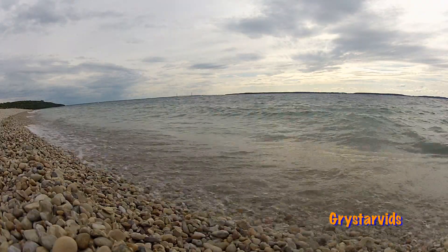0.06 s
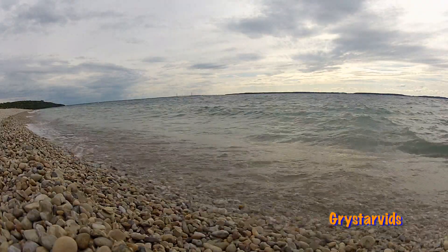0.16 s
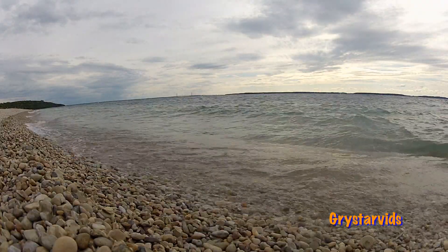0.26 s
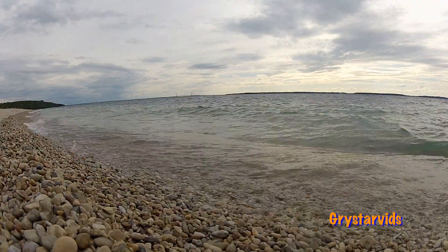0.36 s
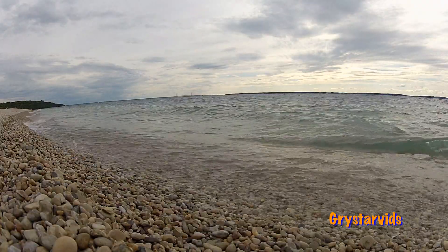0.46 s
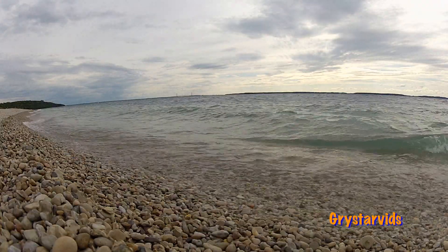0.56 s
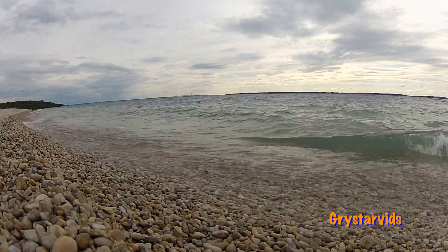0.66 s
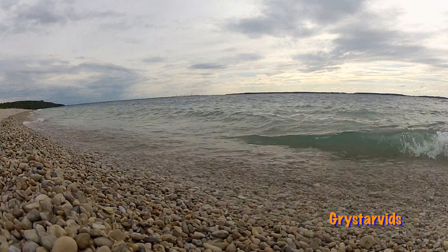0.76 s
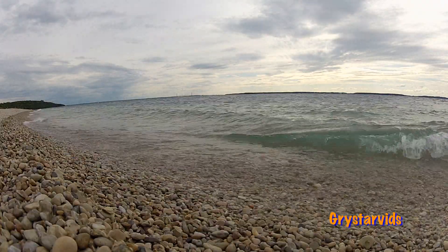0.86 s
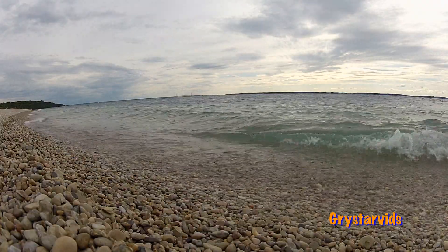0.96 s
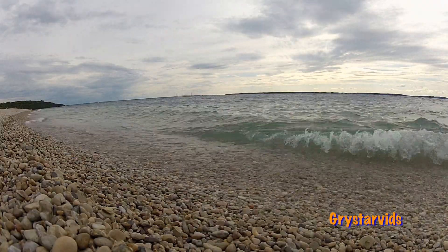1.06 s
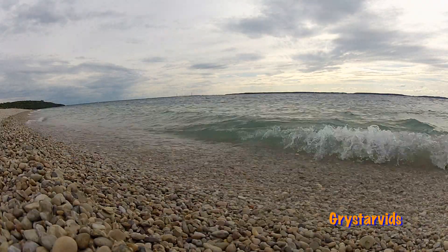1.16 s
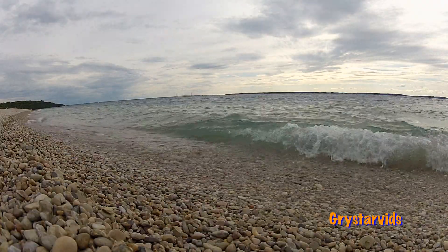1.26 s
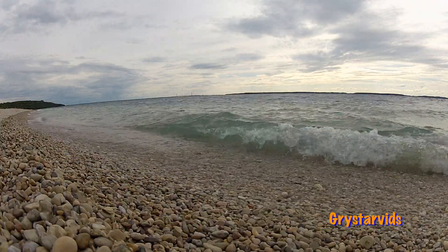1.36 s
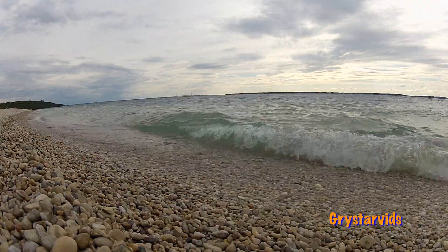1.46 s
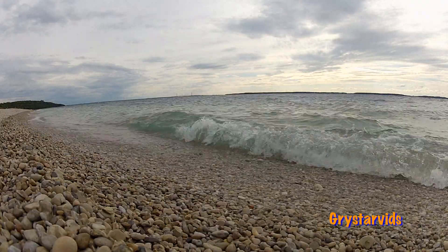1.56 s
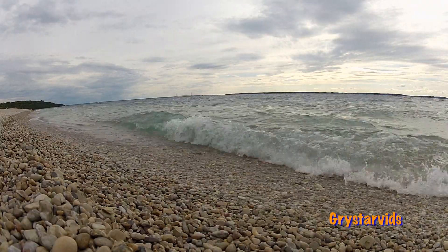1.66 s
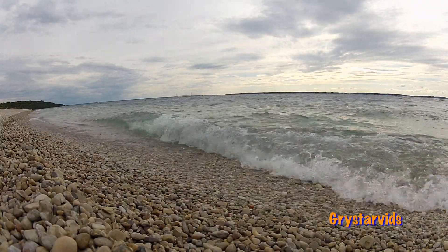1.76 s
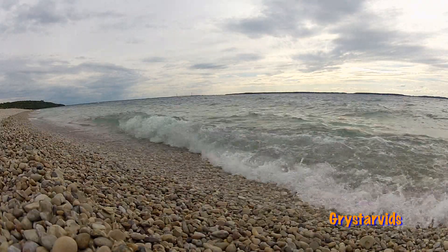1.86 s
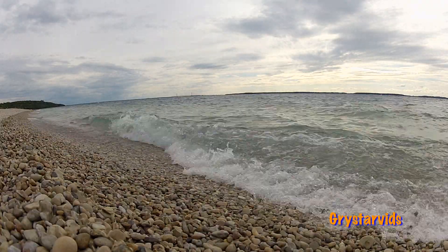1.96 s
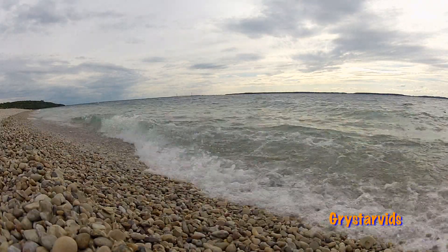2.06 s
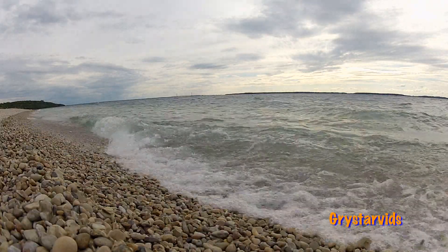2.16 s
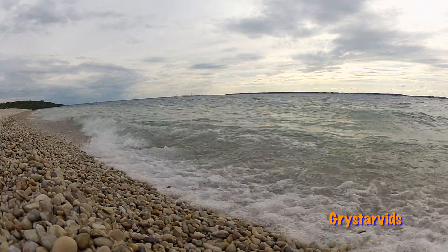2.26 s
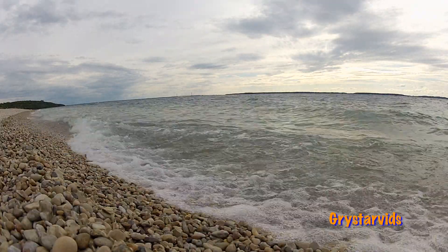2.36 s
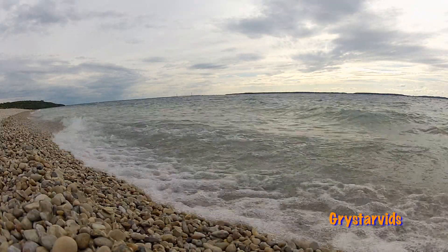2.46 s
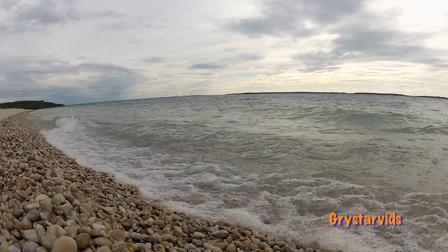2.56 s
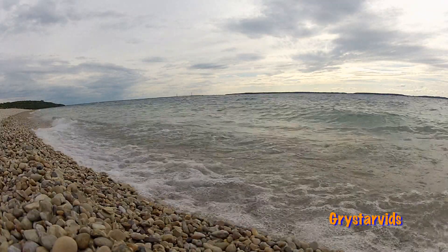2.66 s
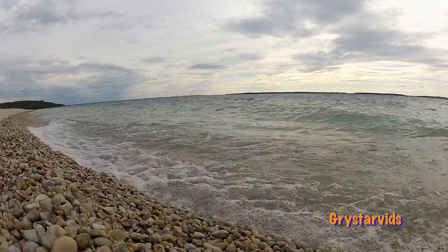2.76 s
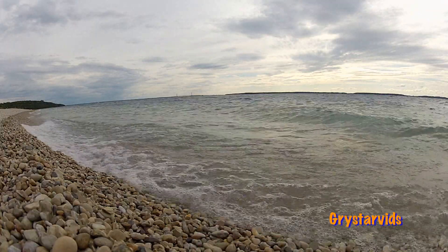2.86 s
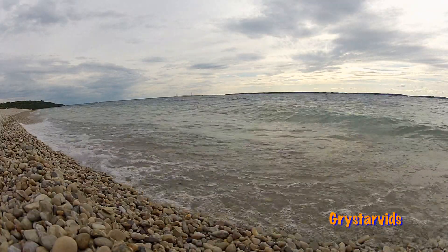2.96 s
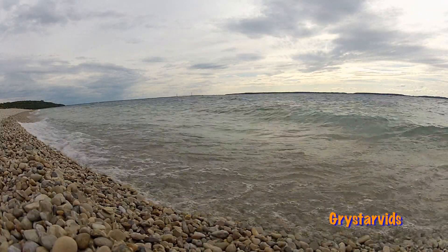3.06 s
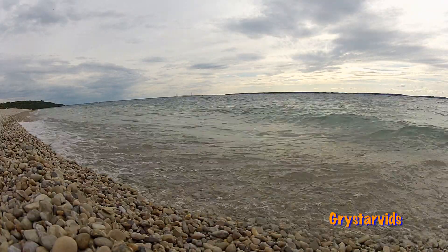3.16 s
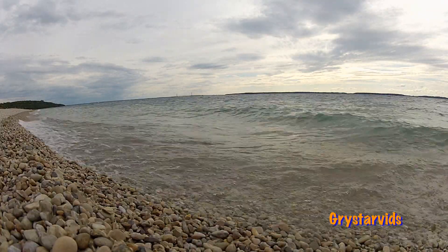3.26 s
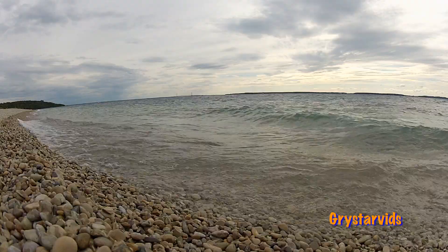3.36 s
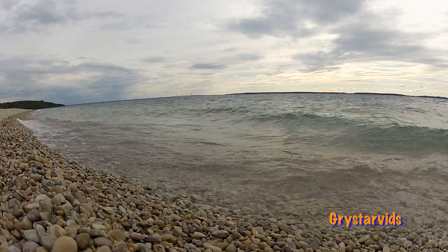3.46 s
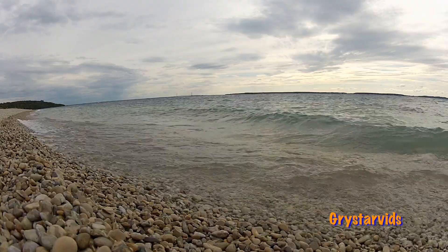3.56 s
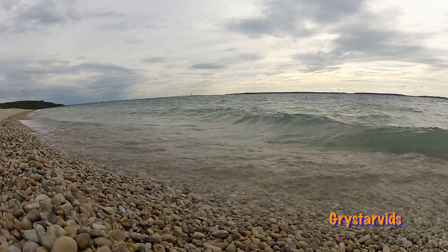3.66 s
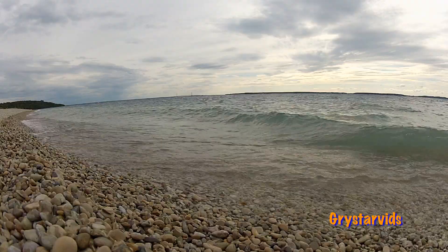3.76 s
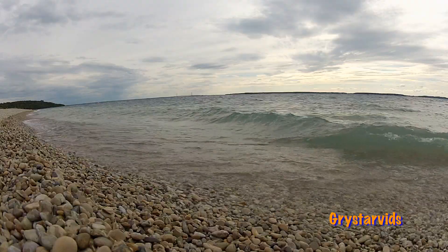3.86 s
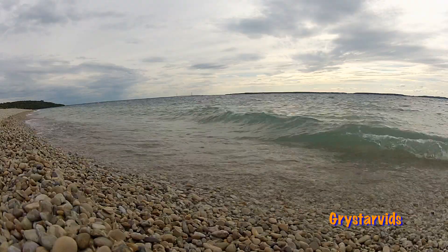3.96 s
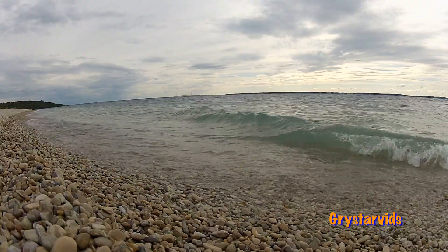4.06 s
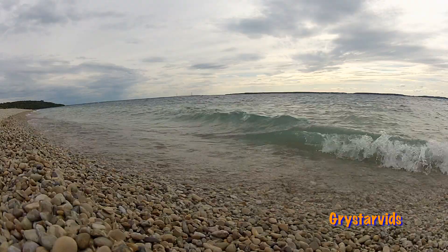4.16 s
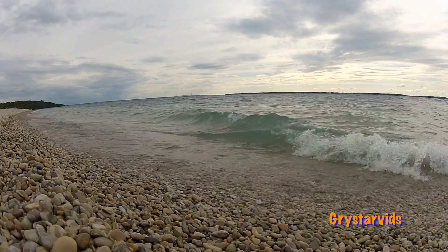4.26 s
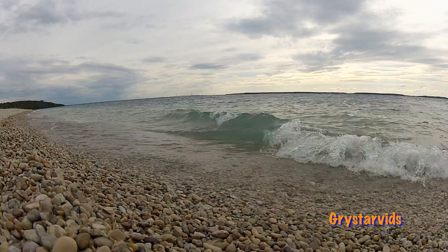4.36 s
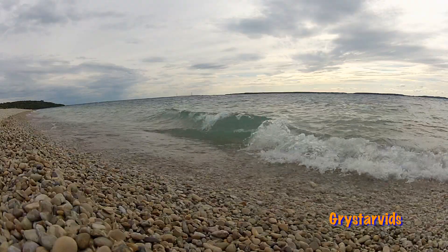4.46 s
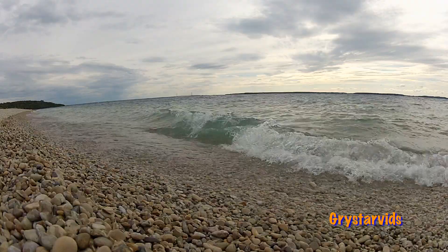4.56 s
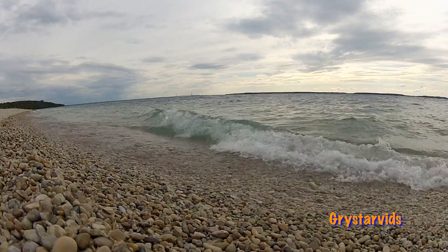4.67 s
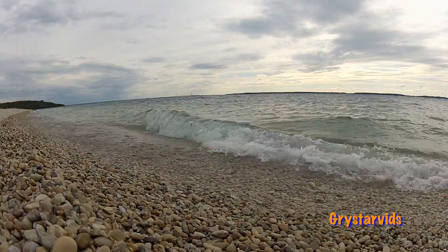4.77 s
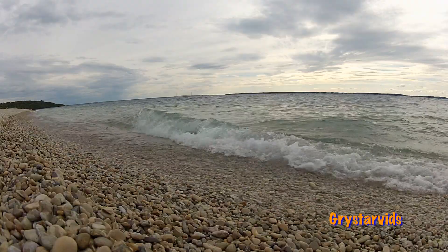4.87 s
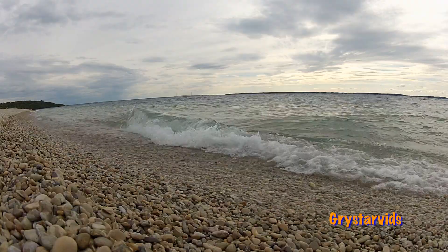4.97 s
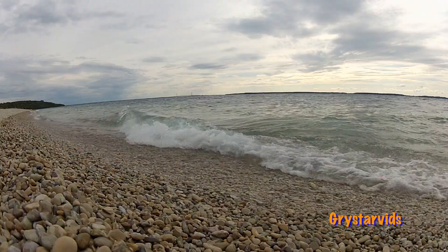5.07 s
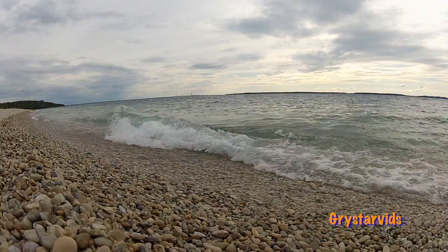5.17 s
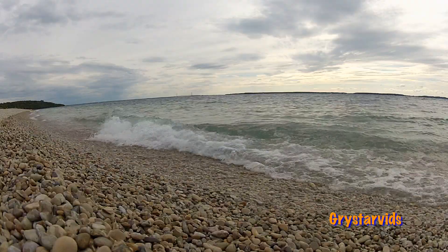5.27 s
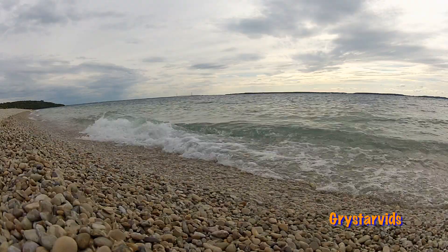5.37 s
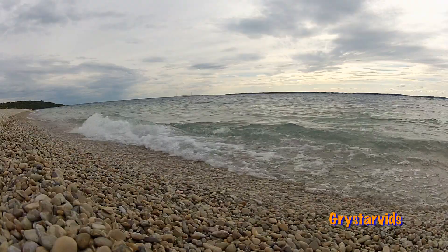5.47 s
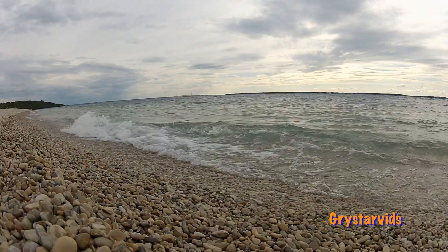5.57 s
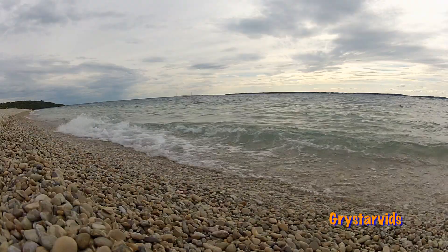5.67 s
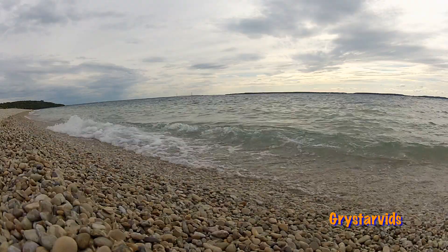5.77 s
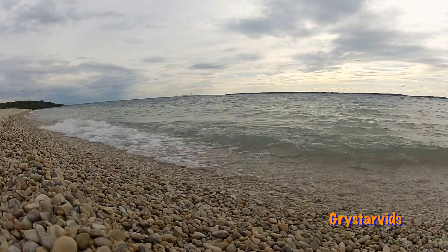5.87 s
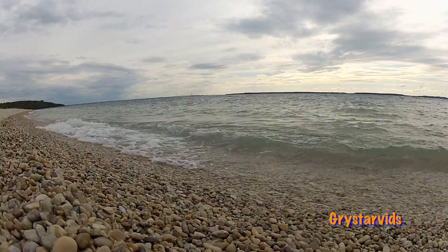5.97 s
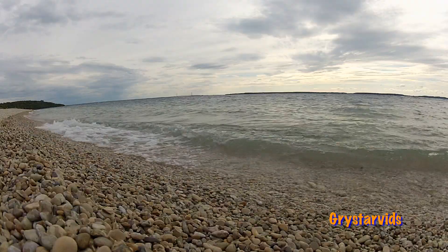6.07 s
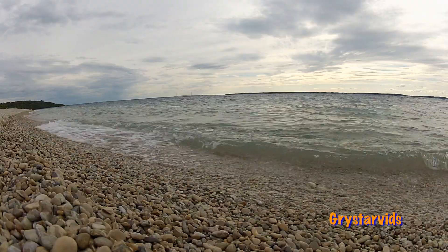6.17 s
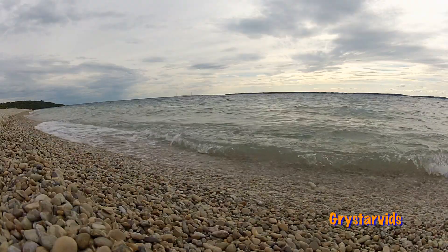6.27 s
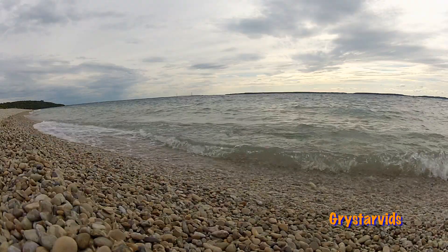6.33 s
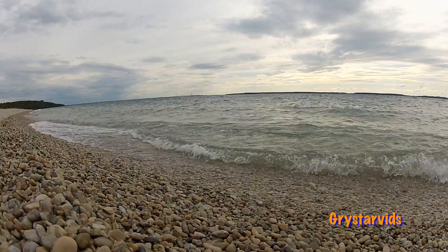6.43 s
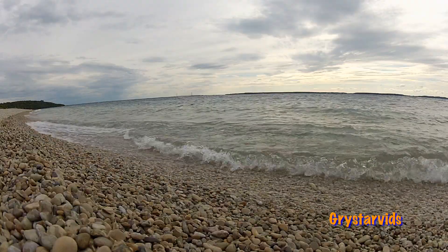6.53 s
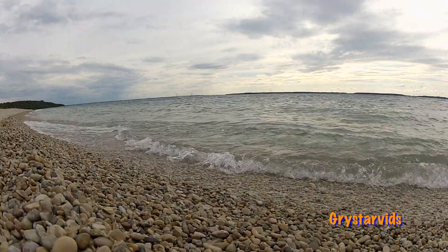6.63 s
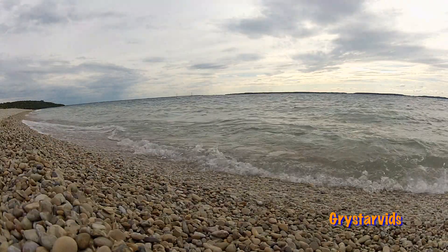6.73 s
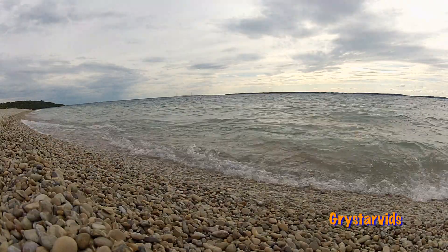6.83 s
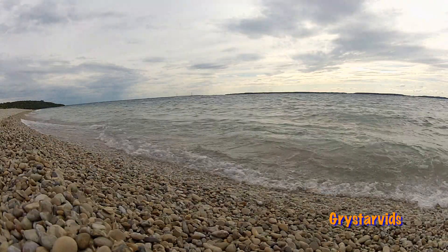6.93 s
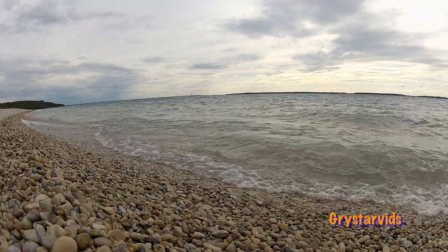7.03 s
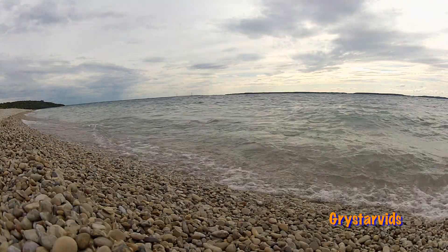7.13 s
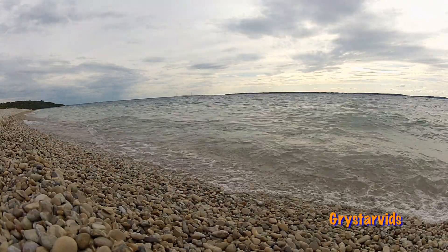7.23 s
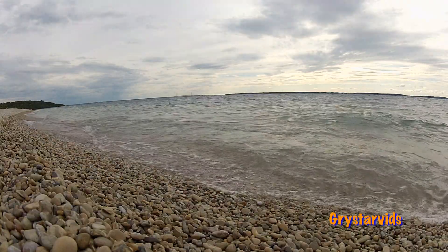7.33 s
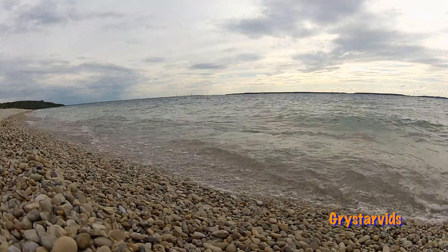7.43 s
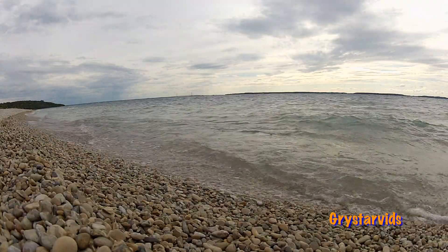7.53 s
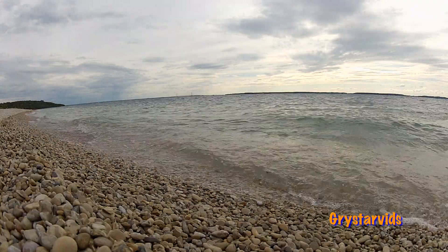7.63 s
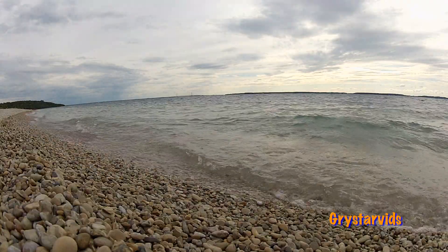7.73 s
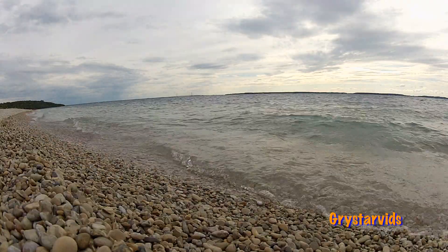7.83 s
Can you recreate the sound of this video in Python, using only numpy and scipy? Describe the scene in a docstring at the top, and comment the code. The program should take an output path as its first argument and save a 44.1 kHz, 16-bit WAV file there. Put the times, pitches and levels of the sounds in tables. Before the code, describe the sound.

Muffled, resonant surf crashes, washes and drains on pebbles in several short surges, with stone knocks, ticking drops and low wind buffeting.

```python
"""Small waves on pebbles, heard inside a case

Three small waves, with lesser ones between, break on a pebble beach: clicks ring banks of bubble resonances,
big in the plunge and finer in the crackling wash that fizzes out. Sine throbs thud, ringing clicks make pebbles
clack and drops tick. The microphone's closed waterproof case colours the water and stones with its resonances
and booms as filtered noise in the breeze; the recorder's coarse sampling adds a glassy top."""
import sys
import numpy as np
from scipy import signal
from scipy.io import wavfile
from scipy.ndimage import uniform_filter1d

SR = 44100
rng = np.random.default_rng(int(sys.argv[2]) if len(sys.argv) > 2 else 0)


def generate_wav(sig):
    """Save sig (samples, or channels by samples) to the path in sys.argv[1] as 16-bit PCM at SR."""
    pcm = np.round(np.clip(np.atleast_2d(sig).T, -1, 1) * 32767).astype(np.int16)
    wavfile.write(sys.argv[1], SR, pcm)


N = 348390
TIME = np.arange(N) / SR


def from_db(db):
    """Decibels to gain."""
    return 10 ** (np.asarray(db) / 20)


def rms_one(x):
    """Scale to rms 1."""
    return x / np.sqrt(np.mean(x ** 2) + 1e-20)


def gain_curve(rows):
    """Join (t/s, level/dB) points with straight lines in dB, as a gain at every sample."""
    t, level_db = np.transpose(rows)
    return from_db(np.interp(TIME, t, level_db))


def cut(x, hz, kind, order=2):
    """Butterworth filter."""
    return signal.sosfilt(signal.butter(order, hz, kind, fs=SR, output="sos"), x + 1e-18)


def resonance(x, hz, width_hz):
    """One resonance with gain 1 at its peak."""
    return signal.lfilter(*signal.iirpeak(hz, hz / width_hz, fs=SR), x + 1e-18)


def noise():
    """White noise."""
    return rng.standard_normal(N)


def drift(rate):
    """Random wandering with rms 1, heading for a new value 2 * rate times per second."""
    steps = rng.standard_normal(4000)
    return rms_one(np.interp(TIME * rate * 2, np.arange(len(steps)), steps))


def evened(x, seconds):
    """Divide out the slow swings of level, leaving a running rms near 1."""
    return x / np.sqrt(uniform_filter1d(x ** 2, int(seconds * SR)) + 1e-20)


def grains(per_s, spread_db):
    """Random clicks of either sign, many small and a few large."""
    size_db = spread_db * np.minimum(rng.exponential(1, N), 4)
    clicks = from_db(size_db) * rng.choice([-1, 1], N)
    return clicks * (rng.random(N) < per_s / SR)


def bubbles(per_s, spread_db, low_hz, high_hz, q, count=16):
    """Each click rings one of many bubble sizes for a few cycles."""
    clicks = grains(per_s, spread_db)
    dealt = rng.integers(0, count, N)
    out = np.zeros(N)
    for k, hz in enumerate(np.linspace(low_hz, high_hz, count)):
        out += resonance(clicks * (dealt == k), hz, hz / q) / np.sqrt(hz)  # bigger bubbles ring louder
    return rms_one(out)


def swell_db(start_s, hold_s, attack_db_per_s, fall_db_per_s):
    """Envelope in dB: attack, hold at 0 dB, release."""
    attack = attack_db_per_s * np.minimum(TIME - start_s, 0)
    release = fall_db_per_s * np.maximum(TIME - start_s - hold_s, 0)
    return attack - release


# resonances of the case: (f/Hz, width/Hz, lift/dB)
CASE_RESONANCES = [(1162, 190, 13.5), (1605, 230, 10.5), (2041, 181, 24.5), (2410, 58, 4.5),
                   (2764, 118, 10.5), (3258, 198, 13), (4040, 120, 3.5), (4800, 135, 8.5),
                   (5187, 550, 12.5)]


def case(x):
    """The case wall dulls outside sound above its corner, except where it resonates."""
    x = cut(x, 1050, "low", order=1)
    for hz, width_hz, lift_db in CASE_RESONANCES:
        x = x + (from_db(lift_db) - 1) * resonance(x, hz, width_hz)
    return x


# the waves, one per row: (t/s of breaking, attack/dB per s, crest collapse/s, run-up on the stones/s,
#   level/dB, growth as it nears/dB per s, dying speed/dB per s, extra crash level/dB)
WAVES = [(-0.66, 55, .25, .36, -57, 0, 14, 2.2), (0.51, 100, 1.56, .04, -53.4, 3.8, 34, -2.5),
         (3.38, 25, .2, .02, -67.5, 0, 15, -5), (4.03, 42, .46, .4, -53, 1.4, 15.5, .5),
         (6.21, 50, .5, .02, -53.7, 0, 15, -.3), (7.57, 80, .17, .02, -57.3, 7, 30, -7)]
CRASH_ARCH_DB, CRASH_PEAKS_AT = 4.0, .74  # extra spray, greatest at this share of the collapse
BACKWASH_FALL_DB_PER_S = 17  # water draining back keeps a wave from dying at once


def surf(size_db, lag_s, run_up_share, fall_share, crash_share, backwash_db, calm_db):
    """Level of one bubble size: a wave breaks, grows as its crest collapses, runs up and drains back."""
    power = from_db(calm_db) ** 2
    for s, attack, collapse_s, run_up_s, db, growth, fall, crash_db in WAVES:
        age = np.clip(TIME - s - lag_s, 0, collapse_s)
        hold_s = collapse_s + run_up_share * run_up_s
        arch = np.interp(age / collapse_s, [0, CRASH_PEAKS_AT, 1], [0, 1, 0])
        wash_db = swell_db(s + lag_s, hold_s, attack, fall * fall_share)
        drain_db = swell_db(s + lag_s, hold_s, attack, BACKWASH_FALL_DB_PER_S * fall_share)
        shape_db = np.maximum(wash_db, backwash_db + drain_db)
        burst_db = crash_share * (crash_db + CRASH_ARCH_DB * arch)
        power = power + from_db(db + size_db + shape_db + growth * age + burst_db) ** 2
    return np.sqrt(power)


# bubble sizes (plunge, coarse foam, fine foam, spray): (lowest f/Hz, highest f/Hz of the band,
#   bursts per s at the height of a wave, size spread/dB, surge depth/dB, level against the wave/dB)
BUBBLES = [(747, 1402, 3400, 3, 1.0, -4.8), (1433, 1902, 4200, 3, 0.8, -0.6),
           (1850, 3096, 8500, 3, 0.7, -0.2), (3176, 6600, 10000, 2.5, 0.7, -9.3)]
# how each size follows a wave, same order: (lag/s, share of the run-up it lasts,
#   dying speed as a share of the wave's, share of the crash, backwash level/dB, level between waves/dB)
RESPONSE = [(.05, .25, 1.05, .25, -7, -73), (.01, 0, 1.05, 0, -3, -67), (0.0, .95, 1.05, 0, -2.4, -64.3),
            (.01, 1.0, 1.15, 1, -4.3, -77.2)]
# water slamming onto the stones and swelling the foam: (t/s, half length/s, swell level/dB)
SLAMS = [(0.75, .06, 2.6), (0.95, .04, 1.5), (1.225, .02, 1.5), (1.46, .035, 2.0), (1.67, .06, 1.8),
         (1.97, .06, 1), (2.4, .08, 1.0), (2.71, .15, 2.4), (4.2, .06, 1.2), (6.37, .05, 1.3),
         (7.25, .1, 1.5)]


def foam():
    """Breaking water: big bubbles plunge, finer ones run up the stones and thin out as a wave dies."""
    slams_db = np.zeros(N)
    for s, half_s, db in SLAMS:
        slams_db += db * np.exp(-np.minimum(((TIME - s) / half_s) ** 2, 20))
    shared_surge = drift(7.8)
    out = np.zeros(N)
    for response, (low_hz, high_hz, per_s, spread_db, surge_db, size_db) in zip(RESPONSE, BUBBLES):
        level = surf(size_db, *response) * from_db(slams_db)
        burst_rate = per_s * np.sqrt(level / level.max())
        bursts = bubbles(burst_rate, spread_db, low_hz * 0.86, high_hz * 1.092, q=4.5)
        sound = evened(cut(case(bursts), [low_hz, high_hz], "band", order=3), .1)
        surge = 0.7 * shared_surge + 0.65 * drift(24)
        out += level * from_db(surge_db * surge) * sound
    return out


SLOSH_LAG_S, SLOSH_LINGERS_S = .03, .42
SLOSH_ATTACK_DB_PER_S, SLOSH_FALL_DB_PER_S = 40, 17
SLOSH_CALM_DB, SLOSH_DB = -73.2, -66.2  # the water heaving between waves and under the largest
SLOSH_FOLLOWS = .9  # share of a wave's level in dB that the slosh follows


def slosh():
    """Dull bubble gurgle lingering behind each breaking edge, over low noise bands of open water."""
    largest_db = np.array(WAVES)[:, 4].max()
    heave_power = from_db(SLOSH_CALM_DB) ** 2
    for s, _, collapse_s, _, db, *_ in WAVES:
        hold_s = collapse_s + SLOSH_LINGERS_S
        shape_db = swell_db(s + SLOSH_LAG_S, hold_s, SLOSH_ATTACK_DB_PER_S, SLOSH_FALL_DB_PER_S)
        wave_db = SLOSH_DB + SLOSH_FOLLOWS * (db - largest_db)
        heave_power = heave_power + from_db(wave_db + shape_db) ** 2
    gurgle = bubbles(per_s=2800, spread_db=2.5, low_hz=269, high_hz=903, q=3.2)
    gurgle = evened(cut(gurgle, 280, "low", order=1), 0.17)
    low_murmur = from_db(-70) * rms_one(cut(noise(), [60, 125], "band"))
    high_murmur = from_db(-71) * rms_one(cut(noise(), [220, 340], "band"))
    return np.sqrt(heave_power) * gurgle + low_murmur + high_murmur


def trickle():
    """Water keeps draining between the stones: dense filtered clicks make a faint, steady fizz."""
    fizz = cut(grains(per_s=12000, spread_db=2.2), [3600, 5100], "band")
    return from_db(-81) * rms_one(fizz)


# steady boom of the case in the breeze, before lift and flutter: (t/s, level/dB)
BREEZE = [(0.0, -55), (0.29, -56), (1.03, -67), (1.69, -68), (1.93, -63), (2.17, -54), (2.57, -54),
          (3.36, -64), (3.8, -66), (4.39, -60), (4.67, -66), (5.33, -61), (5.46, -58), (6.6, -60)]
BREEZE_LIFT_DB, FLUTTER_DB = 3.2, 1.3


def breeze(gust_boom):
    """Eddies set the case booming on its lowest resonance, harder in the gusts."""
    ringing = resonance(resonance(noise(), 167, 42), 176.4, 98)
    steady = gain_curve(BREEZE) * from_db(BREEZE_LIFT_DB + FLUTTER_DB * drift(12))
    return np.hypot(steady, gust_boom) * evened(ringing, .08)


# slow air pressure swings, before a small lift: (t/s, level/dB)
RUMBLE = [(0.0, -71), (0.33, -64), (2.18, -84), (3.34, -70), (4.95, -80), (6.49, -64), (6.53, -72),
          (7.46, -65), (7.55, -78), (7.9, -79)]


def rumble():
    """Slow swings of air pressure rumble as very low resonant noise."""
    swings = cut(resonance(noise(), 26, 8), 34, "low")
    return gain_curve(RUMBLE) * from_db(0.8) * evened(swings, 0.24)


# gusts: (t/s of the peak, rise/s, fall/s, boom level/dB, rush drive level/dB)
GUSTS = [(0.07, .02, .05, -61, -66), (0.94, .025, .07, -52.5, -74), (1.65, .02, .025, -55, -66),
         (2.0, .025, .09, -52.5, -74), (2.27, .04, .04, -60, -60), (2.41, .015, .015, -51, -76),
         (4.47, .045, .015, -47, -63), (4.84, 0.012, .05, -52, -62), (5.04, .02, .03, -53, -72),
         (5.33, .03, .14, -55, -65), (5.83, .03, .06, -51, -71), (6.29, .02, .02, -50, -76),
         (6.405, .015, .04, -48, -74), (6.68, .03, 0.04, -58, -61), (6.80, 0.05, 0.075, -44, -66),
         (6.988, 0.0024, 0.055, -51.5, -52.5), (7.178, 0.018, 0.095, -50, -52),
         (7.245, .025, .025, -44, -62), (7.47, 0.015, 0.023, -64, -63.5), (7.58, 0.025, .13, -47, -54),
         (7.83, 0.04, 0.08, -46.5, -57.5)]


def boom_and_rush():
    """How hard gusts drive the boom and the rush: each swells and dies exponentially."""
    boom, rush = np.zeros(N), np.zeros(N)
    for s, rise_s, fall_s, boom_db, rush_db in GUSTS:
        distance = np.maximum((s - TIME) / rise_s, (TIME - s) / fall_s)
        shape = np.exp(-np.minimum(distance, 20))
        boom += from_db(boom_db) * shape
        rush += from_db(rush_db) * shape
    return boom, rush


# single eddies thumping the case: (t/s of the start, envelope peak level/dB, f/Hz)
BUFFETS = [(6.9867, -42, 365), (6.995, -39.5, 207), (7.018, -43, 150), (7.176, -42, 300),
           (7.207, -34.5, 228), (7.225, -39, 211), (7.242, -44, 180), (7.276, -38.5, 212)]


def gusts(force):
    """Sharp gusts rush round the case as low grainy noise and thump it, with a faint hiss on top."""
    rush = cut(grains(per_s=1800, spread_db=4.0), [215, 360], "band", order=1)
    rush = cut(cut(rush, 820, "low"), 150, "high")
    rush = evened(rush, 0.071)
    hiss = rms_one(cut(case(noise()), 4000, "high"))
    flutter = from_db(1.0 * drift(50))
    out = force * flutter * (from_db(1.0) * rush + from_db(-16) * hiss)
    for s, peak_db, hz in BUFFETS:
        cycles = np.clip((TIME - s) * hz, 0, 20)
        swell = cycles / 0.64  # a thump peaks within its first cycle and is nearly gone after three
        envelope = swell ** 2 * np.exp(2 - 2 * swell)
        out += from_db(peak_db) * envelope * np.sin(2 * np.pi * cycles)
    return out


# drops landing close by: (t/s, peak level/dB)
DROPS = [(0.562, -58), (0.577, -52), (1.141, -56), (1.6136, -45), (2.375, -56), (2.799, -59), (2.837, -57),
         (4.0934, -52), (4.1586, -46), (4.3275, -50), (4.4695, -47.5), (5.83, -55), (5.907, -58),
         (6.0735, -57), (6.689, -51), (6.851, -54.5), (6.996, -52), (7.003, -51), (7.2075, -48.5),
         (7.21, -51)]


def drops():
    """Flying drops tick sharply on the stones, each a click through one bright resonance."""
    tick = cut(resonance(signal.unit_impulse(256), 5300, 900), 3500, "high")
    clicks = np.zeros(N)
    for s, peak_db in DROPS:
        clicks[int(s * SR)] = from_db(peak_db)
    return np.convolve(clicks, tick / np.abs(tick).max())[:N]


# pebbles knocking and water slapping on them: (t/s, peak level/dB, f/Hz, longest spread of touches/s)
CLACKS = [(0.7045, -34, 1420, 0.0045), (0.72, -35, 1600, .006), (0.752, -39, 1750, .004),
          (0.7655, -33, 1650, .009), (0.825, -36, 1600, .008), (1.128, -40, 1790, 0.011),
          (1.218, -35.5, 1850, .012), (1.458, -33, 1900, .011), (1.575, -35.5, 1800, .007),
          (1.681, -40.5, 1910, .003), (1.9865, -36, 1850, 0.0076), (2.099, -37, 1900, .004),
          (2.137, -36, 1750, 0.0063), (2.19, -41, 1900, .004), (2.402, -41.5, 1880, 0.0044),
          (3.6936, -37, 1700, 0.003), (3.879, -42.5, 1050, 0.0097), (6.725, -42.5, 1650, 0.0072)]


def pebbles(count=4):
    """A stone or a slap of water strikes, rings for a moment and settles with a few weaker touches."""
    out = np.zeros(N)
    for s, peak_db, hz, length_s in CLACKS:
        touches = np.zeros(2048)
        later = rng.uniform(.3, 1, count - 1)
        touches[0] = 1
        touches[(later * length_s * SR).astype(int)] = from_db(-7 * later)
        knock = case(resonance(resonance(touches, hz, 600), hz, 1100))
        at = int(s * SR)
        out[at:at + len(knock)] += from_db(peak_db) * knock / np.abs(knock).max()
    return out


# air pockets thudding under a falling crest: (t/s of the middle, half length/s, mid f/Hz, peak level/dB)
THUDS = [(1.65, 0.072, 99, -55.5), (4.18, 0.024, 127, -54), (4.33, 0.035, 100, -62.5),
         (4.46, 0.045, 142, -46), (6.83, 0.027, 116, -56)]


def thuds():
    """Each trapped pocket throbs as a sine for a few cycles, its pitch rising as it breaks up."""
    out = np.zeros(N)
    for s, half_s, hz, db in THUDS:
        t = np.clip((TIME - s) / half_s, -4, 4)
        phase = 2 * np.pi * (hz * half_s * t * (1 + 0.086 * t) + rng.random())
        out += from_db(db) * np.exp(-t ** 2) * np.sin(phase)
    return out


def scene():
    """Surf, stones and wind at one microphone."""
    water = foam() + slosh() + trickle() + drops() + thuds()
    boom, rush = boom_and_rush()
    wind = breeze(boom) + rumble() + gusts(rush)
    return (water + wind + pebbles())[None, :]


HOLD_HZ, CUTOFF_HZ = 12000, 15400  # coarse sampling rate, top of the output


def record(dry):
    """Each coarse sample is held until the next, mirroring the sound about that rate; the top is cut."""
    coarse = signal.resample_poly(cut(dry, 6470, "low", order=8), HOLD_HZ, SR, axis=1)
    held = np.repeat(coarse, 4, axis=1)
    out = signal.resample_poly(held, SR, 4 * HOLD_HZ, axis=1)[:, :N]
    return signal.sosfilt(signal.ellip(10, .2, 70, CUTOFF_HZ, fs=SR, output="sos"), out)


dry = scene()
out = record(dry)
generate_wav(out)
```